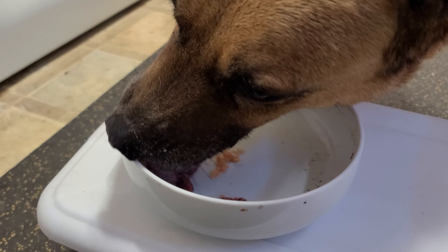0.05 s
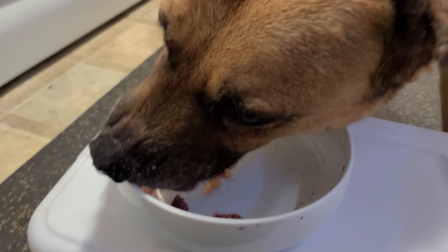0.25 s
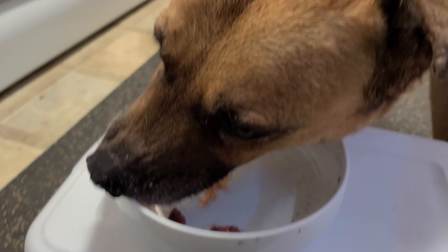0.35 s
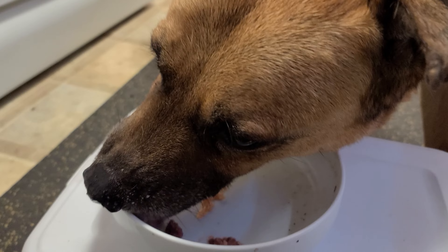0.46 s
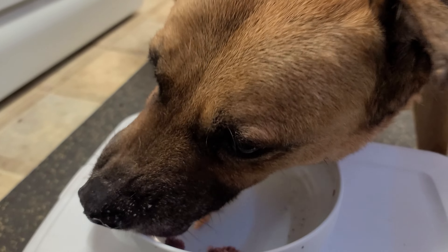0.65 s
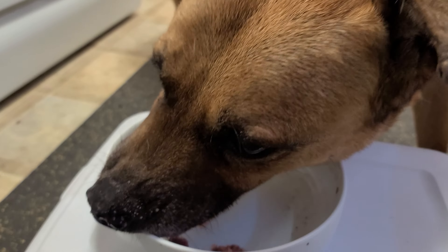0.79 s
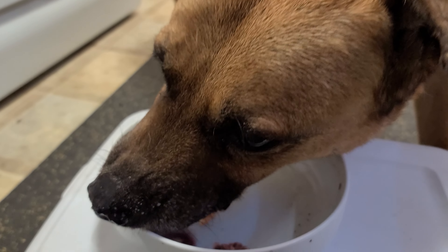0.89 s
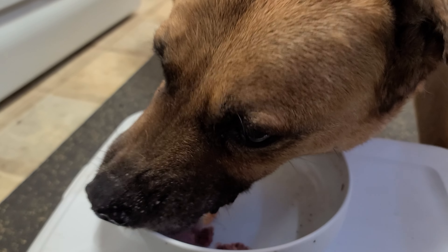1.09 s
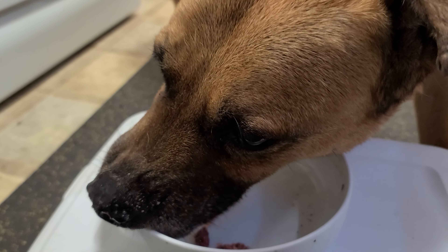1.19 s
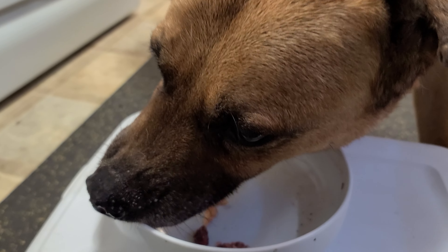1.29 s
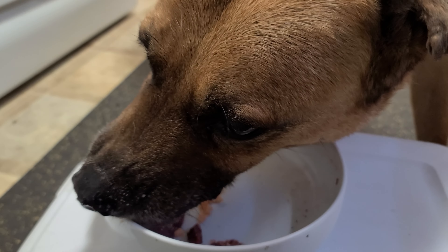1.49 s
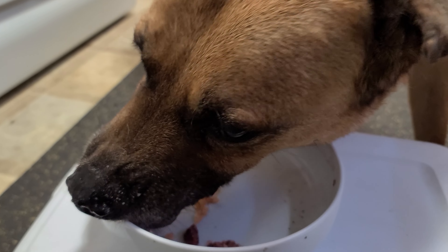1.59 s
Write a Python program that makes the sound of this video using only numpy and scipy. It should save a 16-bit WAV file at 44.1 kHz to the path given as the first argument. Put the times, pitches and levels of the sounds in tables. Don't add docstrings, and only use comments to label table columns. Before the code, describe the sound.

Dog eating wet food indoors, bowl clunking on hollow plastic, with sniffing, a gulp and licks

```python
import sys
import numpy as np
from scipy import signal
from scipy.fft import rfft, irfft
from scipy.io import wavfile
from scipy.ndimage import uniform_filter1d

SR = 44100
rng = np.random.default_rng(int(sys.argv[2]) if len(sys.argv) > 2 else 0)


def rack_gain(trim_db):
    fader = np.asarray(trim_db, float)
    return 10 ** (fader / 20)


def file_out(sig):
    cols = np.atleast_2d(sig).T
    lim = np.clip(cols, -1, 1)
    pcm = np.round(lim * 32767).astype(np.int16)
    wavfile.write(sys.argv[1], SR, pcm)


N = 72765
T = np.arange(N) / SR
STRIKE_T = np.arange(3528) / SR

# (frequency [Hz], density [dB per Hz])
HUM = [(53, -54), (90, -1), (300, -7.5), (606, -14), (998, -20), (1870, -23), (4170, -19), (16000, -30)]
HUM_DB = -47.5
# (frequency [Hz], width [Hz], level [dB])
RUMBLE = (56, 33, -50.5)
# (time [s], flow [dB], nasal ring over flow [dB])
AIR = [(0, -54.5, 3), (.14, -48, 8), (.45, -48, 6), (.675, -50.5, 10), (.705, -41.5, 4), (.745, -46, 5.5),
       (.79, -48, 6.5), (.82, -55.5, 11), (.96, -64, 2.5), (1.126, -57.5, 2.5), (1.164, -43, -2.5),
       (1.215, -52, 4), (1.29, -63.5, 7), (1.39, -59.5, 7.5), (1.43, -49, 5), (1.56, -51, 4),
       (1.65, -42, 1)]
# (frequency [Hz], density [dB per Hz])
HISS = [(3820, -7), (6500, -2.5), (7310, -10), (7850, -9.5), (8300, -3.5), (9230, 0), (11300, -3),
        (13200, 1), (16000, -3)]
# (frequency [Hz], width [Hz])
NOTCHES = [(7750, 440), (14400, 910)]
# (frequency [Hz], width [Hz], level [dB])
NOSTRILS = [
    [(3000, 234, -0.5), (3290, 89, -1), (3580, 190, -3.5), (4290, 350, -8), (5030, 160, -2),
     (5980, 230, -4.5), (7130, 390, -10)],
    [(3000, 123, 1.5), (3250, 140, -3.5), (3730, 280, -4), (4660, 400, -8), (5764, 194, 0),
     (6900, 300, -13)],
    [(2300, 210, -10.5), (3200, 380, -5.5), (3700, 120, -2.5), (4110, 220, -1.5), (4714, 67, 2.5),
     (5780, 130, -2), (9080, 230, -7)],
]
# (first change [s], second change [s])
NOSE_TURNS_S = (0.41, 1.33)
NOSE_BLEND_S = 0.067
# (frequency [Hz], width [Hz], level [dB])
CHEST = [(384, 213, 0.5), (780, 187, 1), (1200, 440, -6.5), (1900, 910, -13)]
# (time [s], peak [dB], pitch [Hz], fizz [dB])
TICKS = [(0.23, -26, 3000, -10), (0.917, -34.5, 3200, -9), (1.051, -58, 1500, -22),
         (1.091, -41.5, 2330, -19), (1.148, -39, 860, -17), (1.16, -37, 1300, 8), (1.211, -24, 1790, -35),
         (1.2243, -20.5, 2250, -21), (1.229, -33, 1940, 7.5), (1.271, -26.5, 690, -35),
         (1.325, -31.5, 1570, -5), (1.328, -32, 4000, -19), (1.371, -34, 1310, -13),
         (1.405, -32, 3000, -14), (1.474, -21.5, 3200, -20), (1.4119, -34, 2500, -10),
         (1.437, -44, 2200, 10), (1.458, -34.5, 2100, -20), (1.624, -30.5, 2250, -15)]
# (time [s], force [dB], brightness over force [dB], mouth resonance [Hz])
SHOVES = [
    [(.243, -29, -15.5, 1500), (.249, -22.5, -10, 1386), (.298, -27, -12, 1290), (.315, -24, -11, 1580),
     (.35, -26.5, -10.5, 1660), (.425, -46, 5.5, 1700)],
    [(.462, -41.5, -18, 1500), (.49, -35, -2, 1900), (.535, -32.5, -7.5, 1670), (.565, -32.5, -3, 1270),
     (.595, -64, 1, 1100)],
    [(.682, -27, -7, 1250), (.688, -23.5, -6.5, 1220), (.745, -26, -11.5, 1550), (.79, -29, -11.5, 1690),
     (.875, -43.5, -19, 1490)],
    [(1.219, -40, -17, 2570), (1.232, -35, -6.5, 2050), (1.27, -40.5, -7.5, 1720), (1.315, -56.5, -5, 1670)],
]
# (frequency [Hz], width [Hz], level [dB])
STEP = [(285.7, 22, -5), (408.4, 82, -2), (587, 57, -9), (651.5, 43, 0.5), (806, 79, 1.5), (1199, 85, -9.5),
        (1406, 150, -14)]
# (frequency [Hz], width [Hz], level [dB])
BOWL = [(1734, 41, -1), (2210, 105, 5.5), (2770, 47, -1.5), (3204, 93, 1), (4000, 133, -2.5),
        (4700, 580, -13), (5720, 80, -11.5)]
STEP_WIDEN, BOWL_WIDEN = 0.98, 2.44
SLIPS_PER_S, SLIP_SPREAD_DB = 1400, 1.5
THUMP_HZ, THUMP_WIDTH_HZ, THUMP_DB = 67.7, 43, -17
MOUTH_DB, MOUTH_WIDTH_HZ, MOUTH_WANDER = -3, 153, 0.063
# (time [s], peak [dB], ring [Hz], brightness [dB], t60 [s])
KNOCKS = [(0.2459, -5.5, 818, -11.5, 0.025), (.2575, -1.5, 590, -19, 0.011), (.267, -5, 403, -16, 0.012),
          (.2895, -9.5, 780, -17.5, 0.035), (.3085, 1, 780, -30, 0.009), (0.312, -1, 398, -34, 0.0056),
          (0.329, -6, 660, -21, 0.0096), (.354, -2.5, 670, -46, 0.0069), (.478, -21, 610, -31, 0.044),
          (0.511, -14, 500, -10, 0.024), (.5295, -6.5, 620, -18, 0.016), (.5345, -6.5, 670, -18.5, 0.015),
          (.556, -12.5, 800, -15, 0.043), (.685, -9, 800, -8.5, 0.016), (0.7107, -6.5, 520, -34, 0.009),
          (0.7182, -2.5, 477, -39, 0.013), (.760, -13, 652, -18, 0.016), (.776, -7, 626, -28, 0.014),
          (0.7815, -2.5, 577, -28, 0.0098), (0.7896, -5.5, 437, -27, 0.023), (.812, -3.5, 631, -32, 0.061),
          (.838, -25.5, 1455, -19, 0.052), (0.943, -30, 634, -5, 0.07), (1.474, -12, 860, -8.5, 0.021)]
# (time [s], peak [dB], frequency [Hz], t60 [s])
PINGS = [(.2468, -19, 3200, 0.019), (.2468, -25, 2280, 0.018), (0.2603, -17, 3250, 0.017),
         (.2668, -12, 2174, 0.029), (0.269, -25, 5710, 0.03), (.294, -27, 2160, 0.011),
         (0.3135, -14, 1900, 0.03), (0.333, -23, 3000, .02), (.347, -25, 2680, 0.018),
         (.364, -21, 715, 0.013), (0.4807, -27, 3140, 0.033), (0.5128, -22, 2320, 0.043),
         (.515, -25.5, 3200, 0.083), (.6853, -13, 2270, 0.054), (.686, -22.5, 3250, 0.11),
         (.689, -17, 1194, 0.092), (.698, -19, 2300, .02), (.706, -35, 2180, .02), (.790, -26.5, 3130, .05),
         (0.811, -26.5, 1720, 0.021), (.839, -19, 678, 0.059), (1.209, -26.5, 680, 0.032),
         (1.2121, -25.5, 1770, 0.027), (1.212, -27, 1200, 0.028), (1.214, -35, 3050, .02),
         (1.248, -27.5, 2390, 0.025), (1.249, -42, 3200, 0.044), (1.282, -33, 780, 0.042),
         (1.2972, -37.5, 1690, 0.065), (1.331, -37, 4000, .03), (1.475, -23.5, 2124, 0.018)]
# (start [s], length [s], level [dB], from [Hz], to [Hz])
TONES = [
    (1.221, .047, -21, 445, 415),
    (1.338, .066, -43, 3170, 3400),
]
ROOM_T60_S, ROOM_DB = .13, -12
# (frequency [Hz], left over right [dB])
LEAN = [(60, -1), (300, -1), (600, -2), (1200, -1), (2500, -8), (5500, -11), (15000, -3)]
# (frequency [Hz], left-right likeness [0 to 1])
LIKE = [(60, 1), (150, 0.82), (400, 0.9), (1000, 0.65), (3000, 0.54), (12000, 0.3)]
# (frequency [Hz], left lead [rad])
TURN = [(900, 0), (2670, 1), (4650, 1.5), (5680, -2), (8440, -2), (16000, -1)]


def evened(x):
    return x / np.sqrt(np.mean(x ** 2) + 1e-20)


def read(points, hz):
    f, value = np.transpose(points)
    return np.interp(np.log(hz + 1), np.log(f + 1), value)


def add(mix, s, sound):
    part = mix[round(s * SR):][:len(sound)]
    part += sound[:len(part)]


def resonate(x, hz, width):
    r = np.exp(-np.pi * width / SR)
    if np.ndim(hz) == 0:
        return 2 * signal.lfilter([1 - r], [1, -r * np.exp(2j * np.pi * hz / SR)], x + 1e-18).real
    turn = np.exp(2j * np.pi * np.cumsum(hz) / SR)
    return 2 * (turn * signal.lfilter([1 - r], [1, -r], x / turn + 1e-18)).real


def through(x, peaks, widen=0.99):
    total = 0
    for k, (hz, width, db) in enumerate(peaks):
        narrow = resonate(x, hz, width * widen)
        total = total + (-1) ** k * rack_gain(db) * resonate(narrow, hz, 3 * width * widen)
    return total


def shaped(table):
    hz = np.fft.rfftfreq(N, 1 / SR)
    inside = (hz > table[0][0]) & (hz < table[-1][0])
    return evened(irfft(rfft(rng.standard_normal(N)) * rack_gain(read(table, hz)) * inside, N))


def wander(n, *sizes):
    x = rng.standard_normal(n)
    for size in sizes:
        x = uniform_filter1d(x, size)
    return evened(x)


def flutter(db, size):
    return rack_gain(db * wander(N, size, size))


def struck(attack_s, t60):
    return np.minimum(STRIKE_T / attack_s, 1) * rack_gain(-60 * STRIKE_T / t60)


def room_tone():
    hz, width, db = RUMBLE
    rumble = evened(through(rng.standard_normal(N), [(hz, width, 0)])) * flutter(1.3, 2500)
    return rack_gain(HUM_DB - 5.0) * shaped(HUM) + rack_gain(db) * rumble


def nose():
    s, flow, ring = np.transpose(AIR)
    flow_db, ring_db = np.interp(T, s, flow), np.interp(T, s, flow + ring)
    early, late = [np.clip((T - turn) / NOSE_BLEND_S + .5, 0, 1) for turn in NOSE_TURNS_S]

    edge = evened(resonate(rng.standard_normal(N), 12700, 300))
    hiss = shaped(HISS) + rack_gain(2.5) * np.clip((T - 1.35) / 0.53, .2, 1) * edge
    for hz, width in NOTCHES:
        hiss = hiss - 0.95 * late * resonate(hiss, hz, width)
    hiss = hiss * rack_gain(flow_db + 4.0) * flutter(1.8, 200)

    air = rng.standard_normal(N)
    shares = (1 - early, early - late, late)
    rings = sum(np.sqrt(share) * evened(through(air, peaks)) for share, peaks in zip(shares, NOSTRILS))
    rings = rings * rack_gain(ring_db) * flutter(0.83, 300)

    chest_db = 0.42 * (ring_db + 43.5) - 49.0 - 4.1 * late
    chest = evened(through(rng.standard_normal(N), CHEST)) * rack_gain(chest_db) * flutter(2.0, 900)
    return hiss + rings + chest


def tick(db, hz, fizz_db):
    spit = rng.standard_normal(len(STRIKE_T)) * struck(.001, .016)
    pop = resonate(resonate(resonate(spit, hz, .7 * hz), hz, hz), hz, 1.5 * hz)
    fizz = through(spit, [(9200, 2100, -4.0), (11680, 430, 12.5), (13700, 2300, -2.0)])
    return rack_gain(db) * (pop / abs(pop).max() + rack_gain(fizz_db) * fizz / abs(fizz).max())


def shoves():
    force, bright, mouth = np.zeros((3, N))
    for rows in SHOVES:
        s, db, rel, hz = np.transpose(rows)
        inside = (T > s[0]) & (T < s[-1])
        force += inside * rack_gain(np.interp(T, s, db))
        bright += inside * rack_gain(np.interp(T, s, db + rel))
        mouth += inside * np.interp(T, s, hz)
    last = T > SHOVES[-1][0][0]

    sizes = rack_gain(SLIP_SPREAD_DB * np.minimum(rng.exponential(1, N), 4))
    slips = sizes * (rng.random(N) < SLIPS_PER_S / SR)
    slips = evened(slips * rng.choice([-1., 1.], N)) + 0.4 * rng.standard_normal(N)

    def scale(peaks, widen):
        return 1 / np.std(through(slips, peaks, widen))

    step = through(slips * force, STEP, STEP_WIDEN) * scale(STEP, STEP_WIDEN)
    scrape = (slips + rng.standard_normal(N)) * bright
    bowl = through(scrape, BOWL, BOWL_WIDEN) * scale(BOWL, BOWL_WIDEN)

    mouth = mouth * (1 + MOUTH_WANDER * wander(N, 500))
    wet = 0
    for k in (1, 1.7):
        narrow = resonate(slips * bright, k * mouth, MOUTH_WIDTH_HZ)
        wet = wet + k ** -1.2 * resonate(narrow, k * mouth, 2 * MOUTH_WIDTH_HZ)
    wet = rack_gain(MOUTH_DB) * wet * scale([(1500, MOUTH_WIDTH_HZ, 0)], 0.86)

    thump = through(slips * force, [(THUMP_HZ, THUMP_WIDTH_HZ, THUMP_DB)])
    thump = thump * scale([(THUMP_HZ, THUMP_WIDTH_HZ, 0)], 0.77)
    return rack_gain(1.5) * step + rack_gain(-1.0 - 5.1 * last) * bowl + wet * (1 + last) + thump


def knock(db, hz, bright_db, t60):
    under = 0.078 * np.sin(2 * np.pi * hz * .62 * STRIKE_T) * rack_gain(-900 * STRIKE_T)
    ring = (np.sin(2 * np.pi * hz * STRIKE_T) + under) * struck(.0012, t60)
    clatter = through(rng.standard_normal(len(STRIKE_T)) * struck(.0015, .02), BOWL, BOWL_WIDEN)
    return rack_gain(db) * (rack_gain(-2.5) * ring + rack_gain(bright_db + 4.5) * clatter / abs(clatter).max())


def ping(db, hz, t60):
    return rack_gain(db) * struck(.0014, t60) * np.sin(2 * np.pi * hz * STRIKE_T)


def swell(length, db, hz, end_hz):
    u = np.arange(0, length, 1 / SR) / length
    waver = 1 + 0.013 * wander(len(u), 200)
    f = (hz + (end_hz - hz) * np.sin(np.pi / 2 * np.minimum(u / 0.72, 1))) * waver
    loudness = rack_gain(db + 81 * (waver - 1)) * np.sin(np.pi * u) ** 0.99
    return loudness * np.sin(2 * np.pi * np.cumsum(f) / SR)


def reflected(x, t60, gap_s):
    t = np.arange(0, t60, 1 / SR)
    taps = rng.choice([-1., 1.], len(t)) * (rng.random(len(t)) < .08) * rack_gain(-60 * t / t60)
    taps = np.append(np.zeros(int(gap_s * SR)), taps)
    return signal.oaconvolve(x, taps / np.linalg.norm(taps))[:N]


def ports(a, b):
    hz = np.fft.rfftfreq(N, 1 / SR)
    like, lean = np.clip(read(LIKE, hz), 0, 1), rack_gain(read(LEAN, hz) / 2)
    za, zb = rfft(a), rfft(b)
    left = (like * za + np.sqrt(1 - like ** 2) * zb) * np.exp(1j * read(TURN, hz)) * lean
    return irfft(np.array([left, za / lean]), N)


def scene():
    air = ports(nose() + room_tone(), nose() + room_tone())
    near = shoves()
    for make, table in ((tick, TICKS), (knock, KNOCKS), (ping, PINGS), (swell, TONES)):
        for s, *settings in table:
            add(near, s, make(*settings))
    walls = rack_gain(ROOM_DB) * np.array([reflected(near, ROOM_T60_S, gap_s) for gap_s in (.008, .0063)])
    drift = 2.36 * wander(N, 1500, 1500)
    turned = (signal.hilbert(near) * np.exp(1j * drift)).real
    return ports(near, turned) + walls + air


def low_pass(x):
    return signal.sosfilt(signal.butter(12, 16910, fs=SR, output="sos"), x)


def record(dry):
    edge = signal.firwin(1501, 15860, fs=SR)
    mix = signal.oaconvolve(dry, edge[None], "same")
    return low_pass(mix)


dry = scene()
out = record(dry)
file_out(out)
```